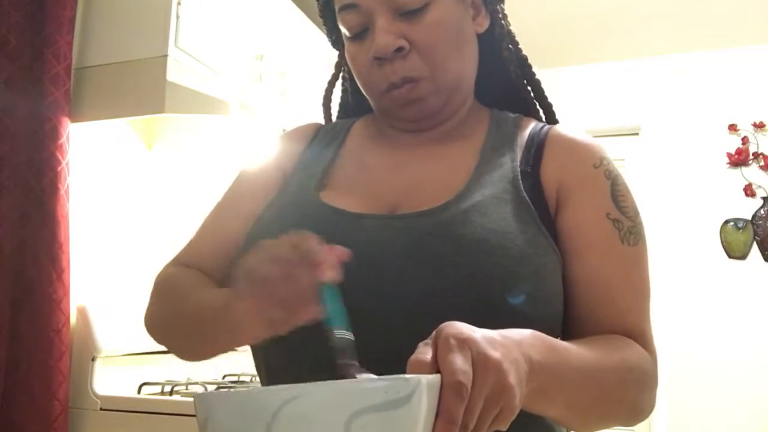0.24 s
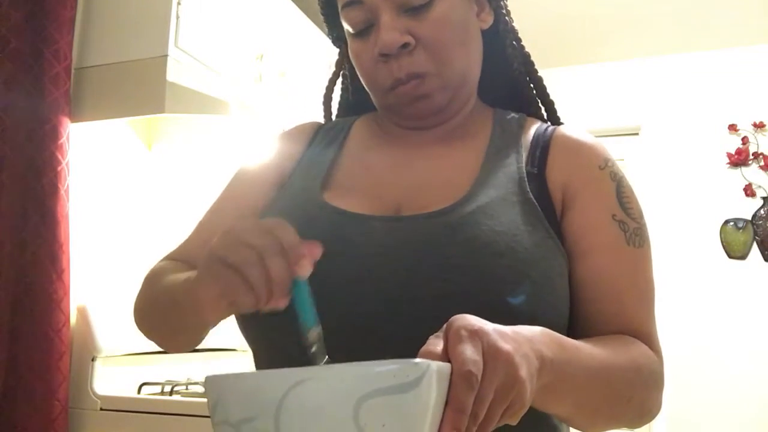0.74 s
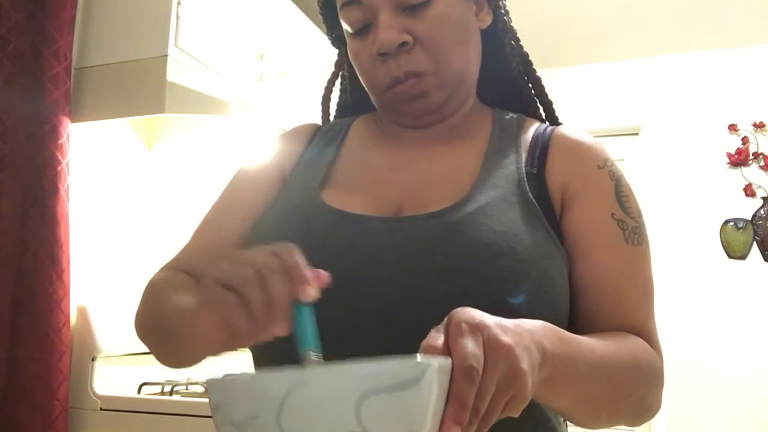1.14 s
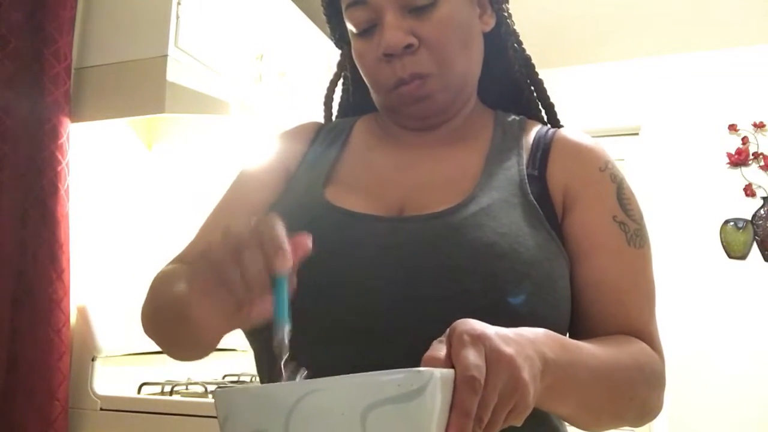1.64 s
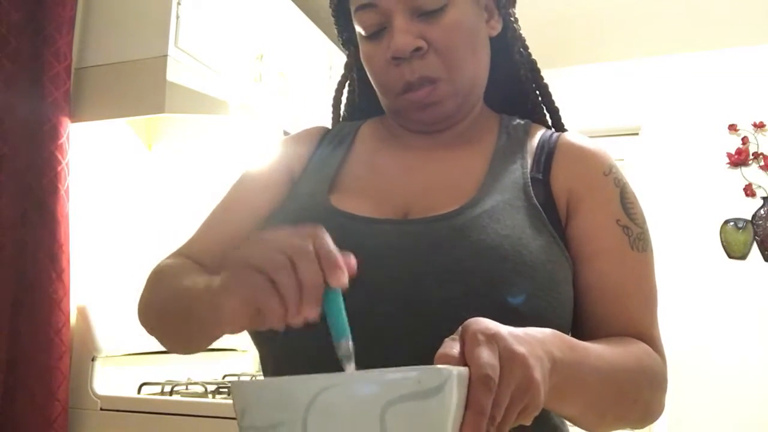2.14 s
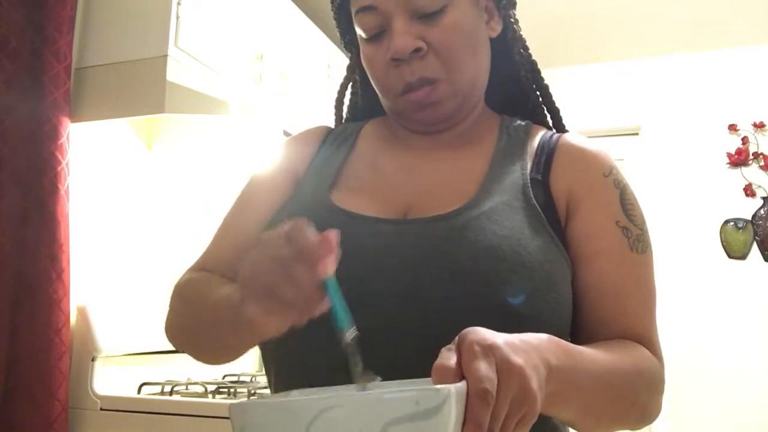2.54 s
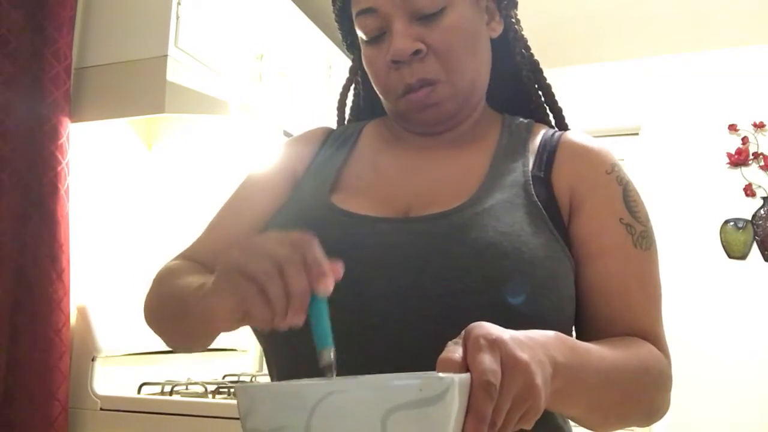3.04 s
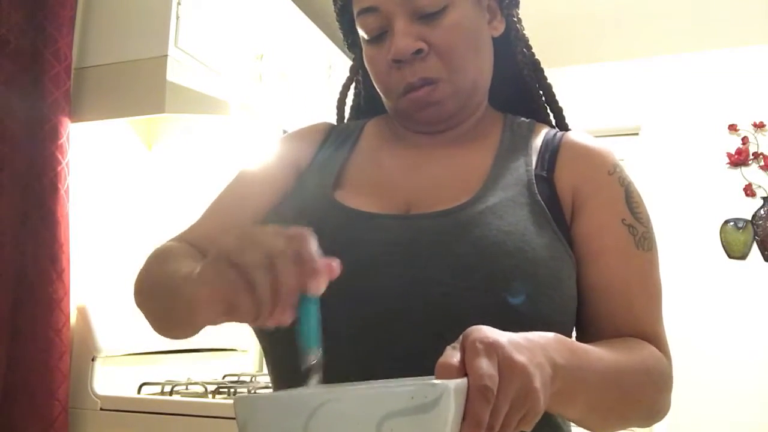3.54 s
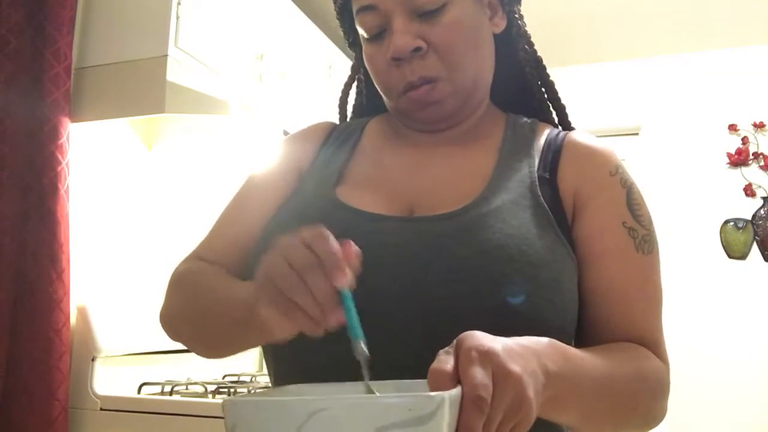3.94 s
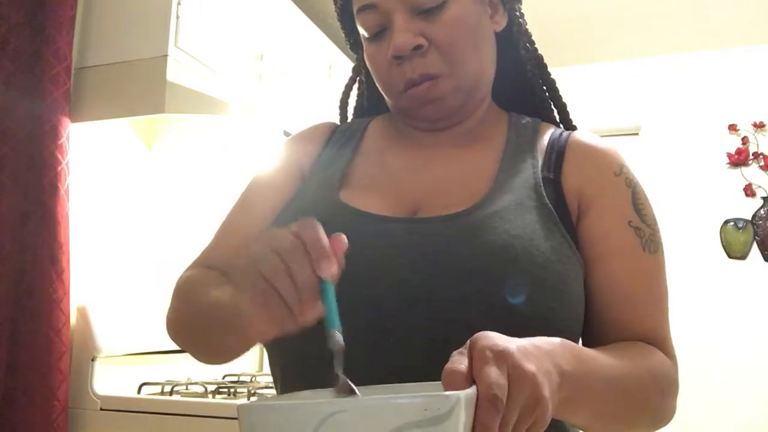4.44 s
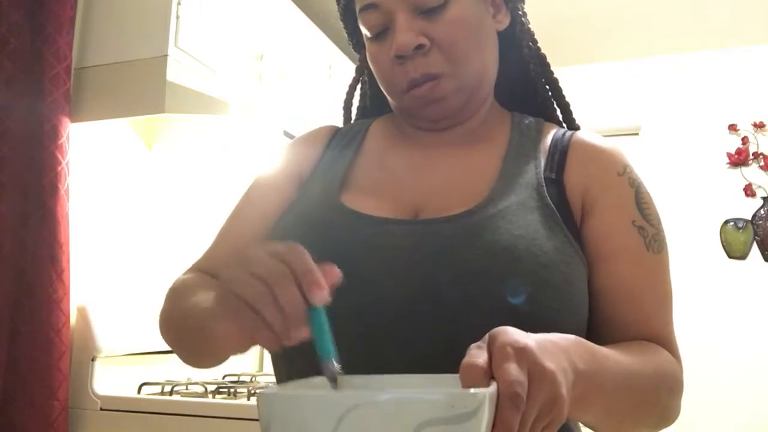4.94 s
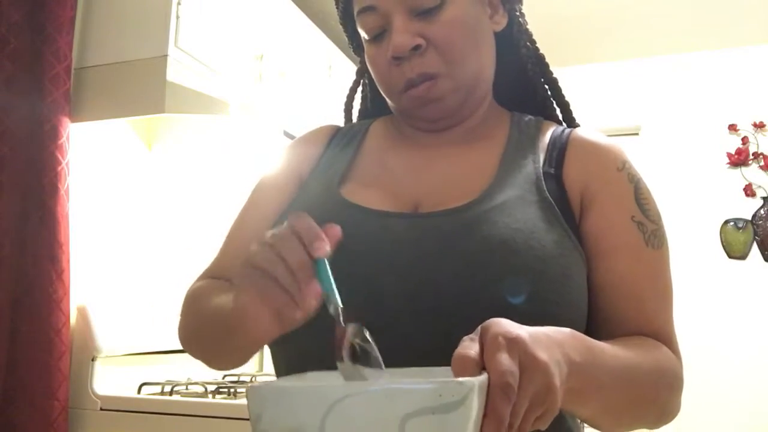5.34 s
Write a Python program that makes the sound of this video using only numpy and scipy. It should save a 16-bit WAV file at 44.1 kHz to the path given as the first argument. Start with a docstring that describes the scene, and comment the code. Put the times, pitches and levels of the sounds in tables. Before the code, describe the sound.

Irregular clinks, dull taps and short gritty scrapes of a fork in a ceramic bowl, with soft powdery rustle and faint appliance noise.

```python
"""A metal fork stirs dry mix in a ceramic bowl: tines knock and scrape the glaze.
Each contact is shaped noise plus decaying sine modes of bowl and fork; scrapes add a fuzzy squeal.
A soft noise bed of filtered grains carries the powder rustle and the noisy tail after one knock.
The kitchen adds a short tail of sparse echoes, over narrow-band appliance hum and steady hiss.
A small microphone close by colours the treble."""
import sys
import numpy as np
from scipy import signal
from scipy.fft import rfft, irfft
from scipy.io import wavfile
from scipy.ndimage import uniform_filter1d

SR = 44100
rng = np.random.default_rng(int(sys.argv[2]) if len(sys.argv) > 2 else 0)


def generate_wav(sig):
    """Save sig (samples, or channels by samples) to the path in sys.argv[1] as 16-bit PCM at SR."""
    pcm = np.round(np.clip(np.atleast_2d(sig).T, -1, 1) * 32767).astype(np.int16)
    wavfile.write(sys.argv[1], SR, pcm)


N = 246695

# Fork blows: (time [s], clink level [dB], belly over clink [dB], wall over clink [dB],
# treble slope [dB/octave], fork shank over clink [dB], tines over clink [dB])
KNOCKS = [(0.043, -56, 9, -9, -14, -2, -16), (0.089, -29.5, 10, 2, -3, -27, -16),
          (0.104, -37.5, 3, 4, -9, -27, -24), (0.364, -50.5, 8.5, -5, -9.5, -19, -20),
          (0.491, -11, -10, -7.5, -2, -10.5, -4), (0.589, -29.5, 6, 8.5, -2, -16, -16),
          (0.788, -38.5, 1, 5.5, -10, 6.5, -12), (0.89, -37, 10.5, 6.5, -7.5, -16, -21),
          (1.47, -47.5, 29, 3.5, -10.5, 3.5, -15.5), (1.652, -34, -12, -5.5, -7.5, 4.5, -11.5),
          (1.667, -40.5, -26, 3, -3.5, -17, -8.5), (1.776, -32, 2.5, 1.5, -11, -21, 0),
          (1.949, -64.5, 0.5, 2, -8.5, 1, -6), (2.421, -32.5, 11.5, 2, -13, -8, -18),
          (2.71, -49, 15.5, -6, -17, -16, -13.5), (2.932, -48, 7, 1.5, -9.5, 10.5, -8.5),
          (3.22, -65, 37.5, -8, 0.5, -2, -3.5), (3.289, -49, 27.5, 2, -5, -8, -22),
          (3.513, -50, 12.5, 7, -5.5, -2, -7.5), (4.309, -64.5, 7, 1, -5, -8.5, -12),
          (4.583, -32.5, -10.5, -3.5, -7.5, 2, 2.5), (5.161, -62.5, 29, -3.5, -1.5, -4.5, -16.5)]
# Fork strokes: (time [s], length [s], clink level [dB], belly over clink [dB],
# treble slope [dB/octave], squeal frequency [Hz], squeal level [dB])
SCRAPES = [(0.056, 0.024, -66, 14.5, -8.5, 950, 0), (0.106, 0.012, -47.5, 5, -2, 3375, 12.5),
           (1.567, 0.036, -75, -3, -7.5, 4200, 1.5), (1.65, 0.067, -47, -12.5, -7.5, 2140, 12.5),
           (1.724, 0.032, -49.5, -4, -7.5, 2930, 7.5), (1.851, 0.0085, -66.5, 17, -5.5, 730, 6),
           (2.694, 0.011, -70.5, -20, -5, 4400, 8), (2.716, 0.018, -66.5, -12.5, -17.5, 2600, 7.5),
           (2.954, 0.031, -52, -6, -9.5, 2774, 7), (3.215, 0.032, -64, -2, -8, 1810, 6.5),
           (3.294, 0.031, -62.5, 21.5, -11, 950, 22), (3.511, 0.042, -48.5, -20, -7, 2140, 7),
           (3.554, 0.05, -43, -60, -9, 1980, 7.5), (3.623, 0.036, -41, -61.5, -6, 1510, 15.5),
           (3.653, 0.026, -36.5, -43, -6, 2590, 4), (3.696, 0.022, -39, -14.5, -6.5, 3730, 3),
           (3.73, 0.059, -55, 4.5, -9.5, 1230, 0), (4.349, 0.097, -80, -24, -12.5, 3140, 14.5),
           (4.404, 0.074, -82, -17.5, -12.5, 1925, 14), (4.608, 0.036, -42.5, -43, -5.5, 2970, 3.5),
           (4.628, 0.026, -43, -9, -9, 2055, 5.5), (5.048, 0.065, -72, 5, -11, 2510, -8)]
# Centres of belly, wall, clink, rim, edge, tines, tine tips: (frequency [Hz])
PARTS_HZ = (800, 1750, 2550, 3365, 5700, 6900, 12500)
# Bowl modes: (frequency [Hz])
BOWL_MODES_HZ = [640, 716, 836, 915, 1050, 1700, 1780, 2060, 2519, 2584, 2900, 3365, 3640, 4478, 5670, 6805,
                 7580, 7885, 8700, 10090, 11020, 12010, 12720, 14900, 15630]
# Bowl modes damped by hand and powder, before any blow's decay share: (level [dB], t60 [s])
BOWL_MODES = [(-18.5, 0.082), (-4, 0.044), (-6.5, 0.074), (-5.5, 0.079), (-10.5, .05), (-6.5, 0.11),
              (-2, 0.098), (-0.5, 0.036), (1.5, 0.07), (1, 0.11), (-13, .03), (-4.5, 0.054), (-8, 0.021),
              (-10, .04), (3, 0.044), (1, .1), (-3, 0.059), (1.5, .025), (-13.5, 0.028), (-5, 0.06),
              (-9, 0.023), (-21.5, .04), (-12, 0.21), (-21.5, .03), (-8.5, .03)]
# Fork bending modes: (frequency [Hz])
FORK_MODES_HZ = [1440, 4200, 8282, 13372]
# Fork bending modes, before any blow's decay share: (level [dB], t60 [s])
FORK_MODES = [(-3, 0.2), (-2, 0.1), (3.5, 0.086), (-1, 0.11)]
# Offsets of edge, tines, tine tips from the treble slope in a knock: (level [dB])
KNOCK_TREBLE_DB = (0.5, 1.5, -2)
# Same offsets in a scrape: (level [dB])
SCRAPE_TREBLE_DB = (2, -0.5, 0)
# Soft noise bed, before the loudest region is lifted: powder rustle,
# plus the noisy tail after the knock at 0.59 s: (time [s], level [dB])
NOISE_BED = [(0, -74), (.7, -66.5), (1.05, -73.5), (1.3, -74.5), (1.6, -70), (1.95, -72), (2.6, -71),
             (2.85, -69.5), (3.15, -65), (3.4, -73.5), (3.9, -71.5), (4.9, -73.5), (5.25, -70), (5.59, -67)]
# Noise bed spectrum shape: (frequency [Hz], relative level [dB])
POWDER = [(400, -3), (900, 7), (2000, 3), (4200, -2.5), (6500, -6.5), (10000, -22), (16000, -26.5)]
# Modes stirred by sliding powder: (frequency [Hz], width [Hz], relative level [dB])
RUBBED = [(2610, 21, -16), (4178, 73, -17), (6870, 80, -21.5)]
# Kitchen decay: (frequency [Hz], t60 [s])
KITCHEN = [(400, 0.26), (1060, .35), (2800, 0.29), (7400, 0.35), (14000, 0.16)]
# Narrow bands of appliance noise: (frequency [Hz], width [Hz], level [dB])
HUM = [(61, 4.2, -68.5), (116.6, 8.5, -70.5), (179, 4.6, -80), (236, 7, -75), (327, 14, -81),
       (507, 25, -81), (775, 40, -77.5), (1130, 40, -84), (1670, 50, -79.5), (2370, 80, -87.5),
       (4100, 100, -91), (6540, 130, -86.5)]
# Hiss spectrum shape: (frequency [Hz], relative level [dB])
HISS = [(18, -34), (30, -12.5), (64, 2.5), (86, -9.5), (121, -0.5), (149, -11.5), (319, -10), (437, -21),
        (512, -17.5), (600, -24.5), (2290, -27.5), (2540, -24), (16000, -45.5)]
# Microphone response: (frequency [Hz], gain [dB])
MICROPHONE = [(7500, -0.75), (9000, 2.5), (10700, -4), (12500, 4), (14000, 1.5), (15000, -0.65)]

CONTACT_SAMPLES = 6000  # length of a ring or a grit burst
SPOT_DB = 2  # standard deviation of mode levels between struck spots

# knock: share of each t60, growing with blow level above -40 dB and with wall level
KNOCK_RING, RING_PER_DB, RING_PER_WALL_DB, MIN_RING = 0.67, 0.0036, 0.0261, 0.2
RIM_OVER_WALL_DB = 3
# second fork mode follows the tines; third follows shank, tines and slope
TINE_DB, SHANK_SHARE, OVERTONE_DB = -0.5, 0.4, 6.5
CRACK_DB, CRACK_PER_WALL_DB, CRACK_T60_S = 11.5, 0.34, 0.014  # stronger on the wall
SHUDDER_DB, SHUDDER_T60_S = -18, 0.08  # close weak modes blur into noise under the crack
SETTLE_DB, SETTLE_S = -7, 0.017  # ring drops as fork and powder settle back on the glaze
KNOCK_DELAY_S, KNOCK_RISE_S = 0.0004, 0.0011

# scrape: the wall follows the belly in part
WALL_SHARE, WALL_DB, RIM_DB, FORK_DB = 0.24, 1.5, 1, -1.5
CHATTER_DB, CHATTER_S = 1.5, 0.002  # tines stick and slip: random level flutter
RASP_DB, SQUEAL_WIDTH_HZ = 14.5, 170  # width of each of two resonances in series

# a louder noise bed is loudest higher up
QUIET_DB, QUIET_HZ, LOUD_DB, LOUD_HZ = -71.5, 2700, -67, 4200
REGION_DB, REGION_OCTAVES = 5.5, 0.36
KITCHEN_DB, TURN_HZ, ECHO_SPACING_SAMPLES = -10, 3, 20
HISS_DB = -63
BOWL_LOWCUT_HZ, EDGE_HZ = 520, 15850


def knock(s, db, belly_db, wall_db, slope_db, shank_db, tine_db):
    """A blow: a short crack of contact noise over ringing modes of bowl and fork."""
    parts_db = parts_of(belly_db, wall_db, wall_db + RIM_OVER_WALL_DB, slope_db, KNOCK_TREBLE_DB)
    parts = list(zip(PARTS_HZ, parts_db))
    *_, third_db, tip_db = read(parts, np.array(FORK_MODES_HZ))
    third_db += SHANK_SHARE * shank_db + (1 - SHANK_SHARE) * tine_db + OVERTONE_DB
    fork_db = [shank_db, tine_db + TINE_DB, third_db, tip_db]

    ring = KNOCK_RING + RING_PER_DB * (db + 40) + RING_PER_WALL_DB * wall_db
    modes = ringing(parts, max(ring, MIN_RING), fork_db)
    t = np.arange(len(modes)) / SR
    modes = modes * gain_of(SETTLE_DB * (1 - np.exp(-t / SETTLE_S)))

    bass = [(250, belly_db - 7.0), (520, belly_db - 12.0)]
    crack = coloured(rng.standard_normal(len(t)), bass + parts)
    decay = gain_of(-60 * t / CRACK_T60_S) + gain_of(SHUDDER_DB - 60 * t / SHUDDER_T60_S)
    crack = crack * gain_of(CRACK_DB + CRACK_PER_WALL_DB * wall_db) * decay

    rise = 1 - np.exp(-t / KNOCK_RISE_S)
    return s + KNOCK_DELAY_S, gain_of(db) * (modes + crack) * rise


def scrape(s, length, db, belly_db, slope_db, squeal_hz, squeal_db):
    """Tines chatter over glaze: gritty clicks drive the modes, a broad rasp and one fuzzy squeal."""
    wall_db = WALL_SHARE * belly_db + WALL_DB
    parts_db = parts_of(belly_db, wall_db, RIM_DB, slope_db, SCRAPE_TREBLE_DB)
    parts = list(zip(PARTS_HZ, parts_db))
    grit = grit_of(length)

    modes = ringing(parts, 1.0, FORK_DB + read(parts, np.array(FORK_MODES_HZ)))
    power = np.sqrt(np.sum(gain_of(parts_db) ** 2))
    rung = power * signal.fftconvolve(grit, modes / np.linalg.norm(modes))

    bass = [(100, parts_db[0] - 61.5), (500, parts_db[0] - 25)]
    rasp = gain_of(RASP_DB) * coloured(grit, bass + parts)

    squeal = resonate(grit, squeal_hz, SQUEAL_WIDTH_HZ)
    squeal = resonate(squeal, squeal_hz, SQUEAL_WIDTH_HZ)
    squeal = coloured(squeal, [(300, -67), (700, 36)])  # bass cut; level is set next
    squeal = squeal * np.linalg.norm(grit) / np.linalg.norm(squeal)

    add(rung, 0, rasp + gain_of(squeal_db) * squeal)
    # bass cut: removes the low thump of abruptly started sines
    return s, gain_of(db) * coloured(rung, [(250, -30.5), (600, -2)])


def grit_of(length):
    """Uneven friction clicks: heavy-tailed noise with random flutter, swelling and fading once."""
    n = CONTACT_SAMPLES
    clicks = gain_of(2.26 * rng.exponential(1, n)) * rng.standard_normal(n)
    flutter = uniform_filter1d(rng.standard_normal(n), max(round(CHATTER_S * SR), 1))
    clicks = clicks * gain_of(CHATTER_DB * evened(flutter))
    along = np.clip(np.arange(n) / SR / length, 0, 1)
    return evened(clicks) * np.sin(np.pi * along ** 0.88) ** 0.7


def ringing(parts, ring, fork_db):
    """Decaying sine modes after one contact; the struck spot favours some by chance."""
    db, t60 = np.transpose(BOWL_MODES + FORK_MODES)[:, :, None]
    hz = np.array(BOWL_MODES_HZ + FORK_MODES_HZ)[:, None]
    t = np.arange(CONTACT_SAMPLES) / SR
    struck_db = np.append(read(parts, np.array(BOWL_MODES_HZ)), fork_db)[:, None]
    spot_db = SPOT_DB * rng.standard_normal(hz.shape)
    level = gain_of(db + struck_db + spot_db - 60 * t / (t60 * ring))
    return (level * np.sin(2 * np.pi * hz * t)).sum(axis=0)


def parts_of(belly_db, wall_db, rim_db, slope_db, off_db):
    """How strongly a contact moves each part, over the clink; treble follows a slope."""
    octaves = np.log2(np.array(PARTS_HZ[4:]) / PARTS_HZ[2])
    treble_db = off_db + slope_db * octaves
    return [belly_db, wall_db, 0, rim_db, *treble_db]


def noise_bed():
    """Powder rustle and a knock's noisy tail: grain noise plus rubbed modes, loudest region drifting."""
    grains = gain_of(1.1 * rng.exponential(1, N)) * rng.standard_normal(N)
    rubbed = sum(gain_of(db) * evened(resonate(grains, hz, width)) for hz, width, db in RUBBED)
    hz, t, z = signal.stft(evened(coloured(grains, POWDER)) + rubbed, SR, nperseg=512)
    db = np.interp(t, *np.transpose(NOISE_BED))
    centre_hz = np.interp(db, [QUIET_DB, LOUD_DB], [QUIET_HZ, LOUD_HZ])
    octaves = np.log2((hz[:, None] + 1) / centre_hz)
    z = z * gain_of(db + REGION_DB * np.exp(-(octaves / REGION_OCTAVES) ** 2))
    return signal.istft(z, SR, nperseg=512)[1][:N]


def kitchen(x):
    """Room tail: sparse echoes of random sign, decay set by frequency; three tails take turns."""
    out = np.zeros(N)
    turn = 2 * np.pi * TURN_HZ * np.arange(N) / SR
    for k in range(3):
        taps = np.zeros(SR // 2)
        at = np.arange(0, SR // 2 - ECHO_SPACING_SAMPLES, ECHO_SPACING_SAMPLES)
        jitter = rng.integers(0, ECHO_SPACING_SAMPLES, len(at))
        taps[at + jitter] = rng.choice([-1., 1.], len(at))
        hz, t, z = signal.stft(taps, SR, nperseg=256)
        z = z * gain_of(-60 * t / read(KITCHEN, hz)[:, None])
        tail = signal.istft(z, SR, nperseg=256)[1]
        tail *= np.clip((np.arange(len(tail)) / SR - 0.003) / 0.0063, 0, 1)  # gap before the walls answer
        share = np.sqrt(2 / 3) * np.cos(turn + k * np.pi / 3)  # squares sum to 1
        out += signal.fftconvolve(x * share, tail / np.linalg.norm(tail))[:N]
    return out


def appliances():
    """Appliance noise: a wavering hum of narrow noise bands over steady hiss."""
    hum = sum(gain_of(db) * evened(resonate(rng.standard_normal(N), hz, width)) for hz, width, db in HUM)
    return hum + gain_of(HISS_DB) * evened(coloured(rng.standard_normal(N), HISS))


def gain_of(db):
    """Decibels to gain."""
    return 10 ** (np.asarray(db) / 20)


def evened(x):
    """Scales to rms 1."""
    return x / np.sqrt(np.mean(x ** 2) + 1e-20)


def read(points, hz):
    """Interpolates a table along log frequency."""
    f, value = np.transpose(points)
    return np.interp(np.log(hz + 1), np.log(f + 1), value)


def add(mix, s, sound):
    """Adds a sound into the mix at second s."""
    part = mix[round(s * SR):][:len(sound)]
    part += sound[:len(part)]


def coloured(x, points):
    """Shapes x by a spectrum in dB."""
    hz = np.fft.rfftfreq(len(x), 1 / SR)
    return irfft(rfft(x) * gain_of(read(points, hz)), len(x))


def resonate(x, hz, width):
    """A fixed two-pole resonance, width in Hz."""
    r = np.exp(-np.pi * width / SR)
    return signal.lfilter([1 - r], [1, -2 * r * np.cos(2 * np.pi * hz / SR), r * r], x)


def scene():
    """Fork, bowl and powder in the kitchen."""
    bowl = np.zeros(N)
    for row in KNOCKS:
        add(bowl, *knock(*row))
    for row in SCRAPES:
        add(bowl, *scrape(*row))
    # a small bowl radiates little bass
    lowcut = signal.butter(2, BOWL_LOWCUT_HZ, "high", fs=SR, output="sos")
    bowl = signal.sosfilt(lowcut, bowl)
    return (bowl + gain_of(KITCHEN_DB) * kitchen(bowl) + noise_bed() + appliances())[None]


def record(dry):
    """Small microphone: uneven treble response, soft knee near full scale, then a band limit."""
    heard = coloured(dry[0], MICROPHONE)[None]
    heard = heard / (1 + heard ** 6) ** (1 / 6)
    lowpass = signal.firwin(511, EDGE_HZ, window=("kaiser", 9), fs=SR)
    return signal.oaconvolve(heard, lowpass[None], "same")


dry = scene()
out = record(dry)
generate_wav(out)
```